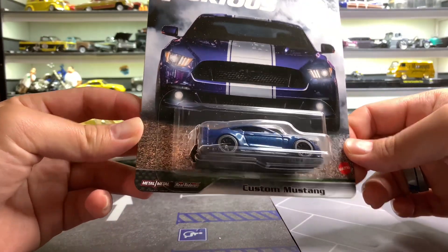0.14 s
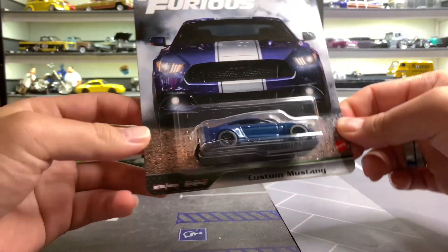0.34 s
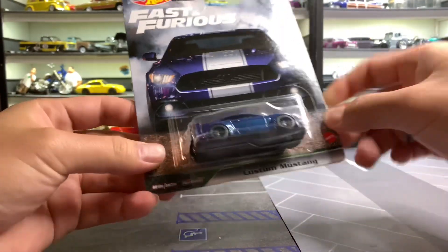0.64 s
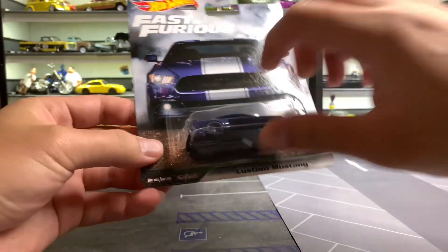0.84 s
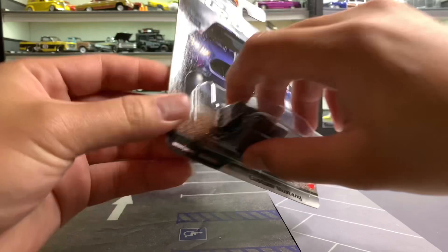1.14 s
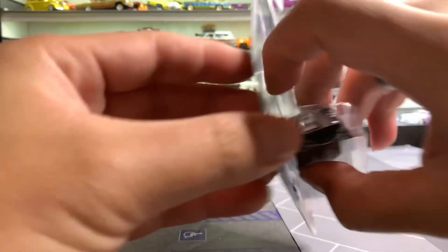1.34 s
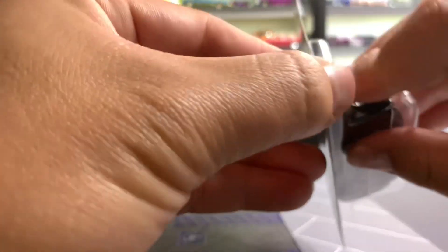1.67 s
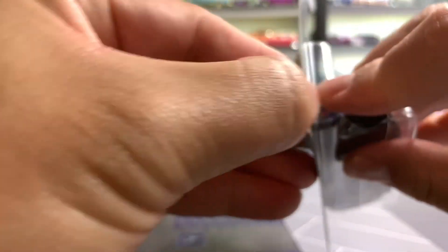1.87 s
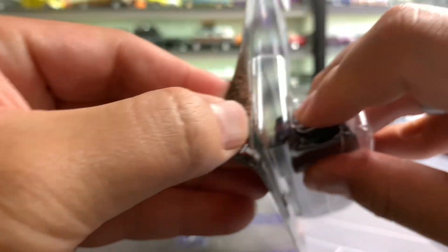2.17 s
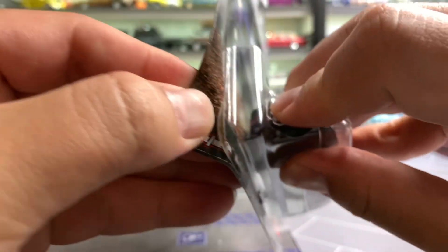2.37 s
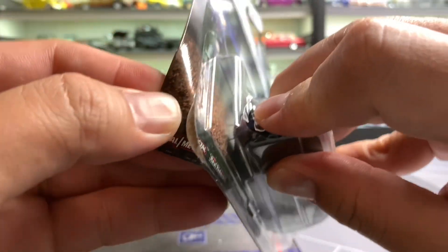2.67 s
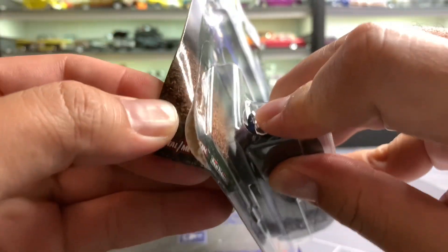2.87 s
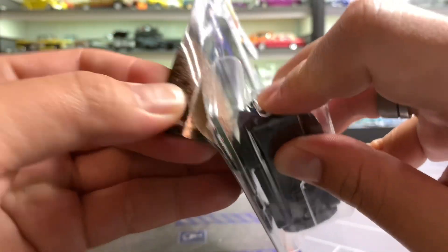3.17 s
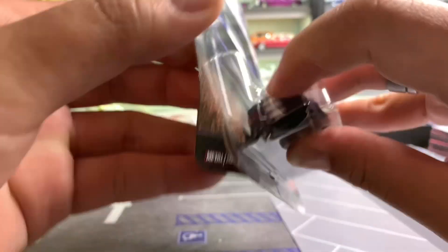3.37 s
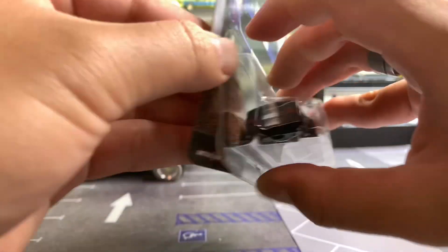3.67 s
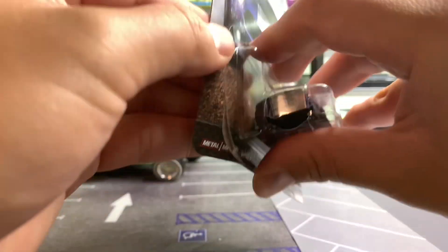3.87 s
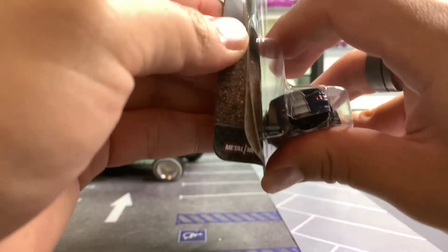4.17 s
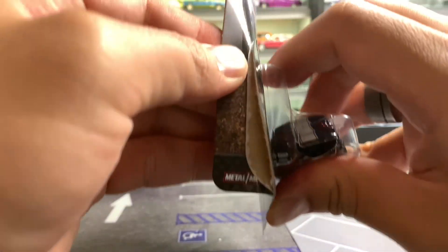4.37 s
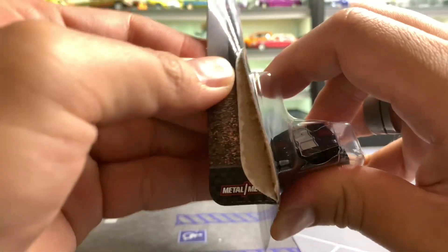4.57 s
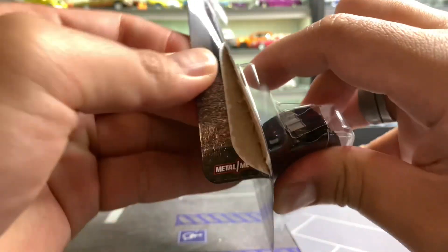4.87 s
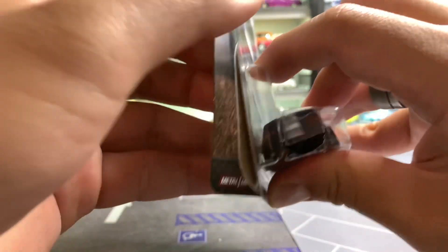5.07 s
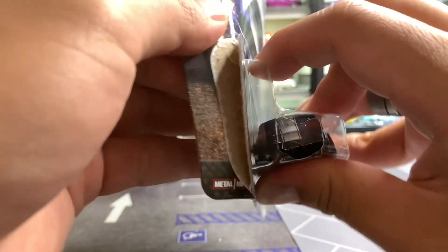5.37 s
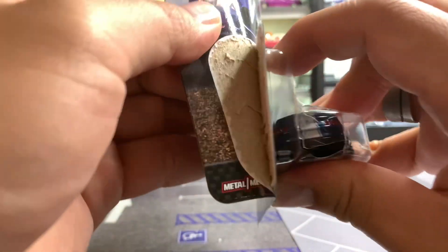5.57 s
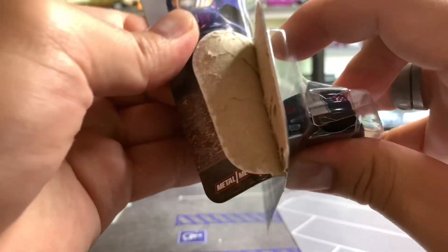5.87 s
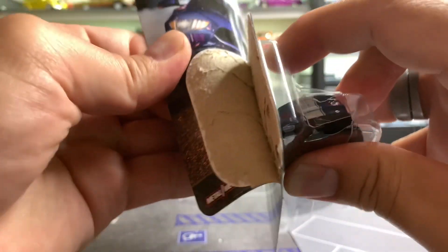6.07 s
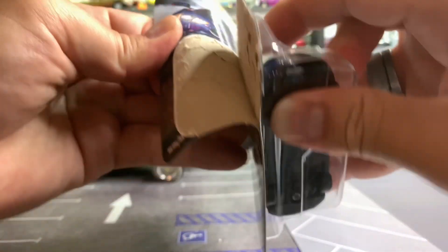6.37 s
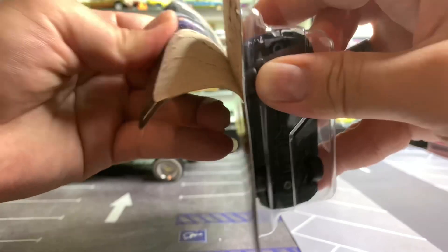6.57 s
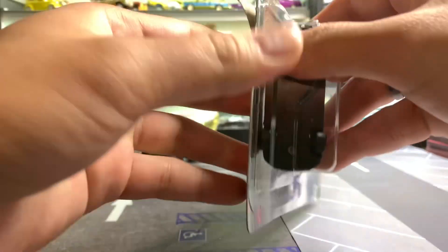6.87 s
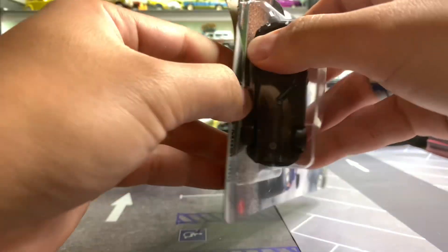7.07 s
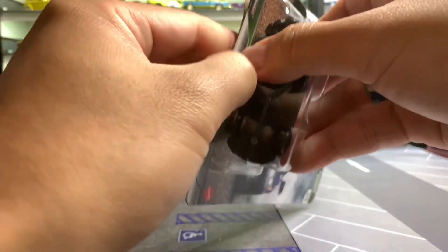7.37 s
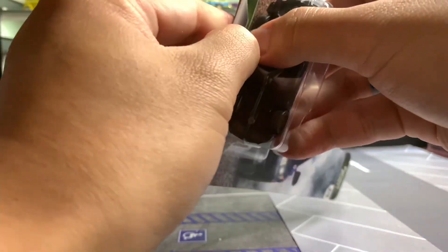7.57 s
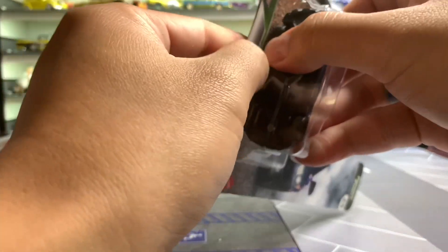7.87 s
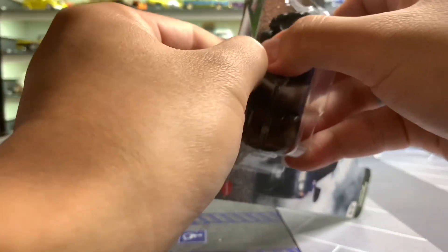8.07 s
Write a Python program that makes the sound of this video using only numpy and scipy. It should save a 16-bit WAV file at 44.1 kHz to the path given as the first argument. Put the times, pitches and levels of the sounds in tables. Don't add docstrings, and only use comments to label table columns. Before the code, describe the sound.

Two hands open a blister pack at close range. Soft knocks and rubs give way to bright single cracks, a brief squeaky creak and fine fizzing as glued paper fibres part. A ripping burst peaks after five seconds, more tearing follows, then bumps, a sharp plastic snap and small handling sounds. Short room reflections and very quiet low fan rumble surround it.

```python
import sys
import numpy as np
from scipy import signal
from scipy.fft import rfft, irfft
from scipy.io import wavfile
from scipy.ndimage import uniform_filter1d

SR = 44100
rng = np.random.default_rng(int(sys.argv[2]) if len(sys.argv) > 2 else 0)


def unload_audio(sound):
    columns = np.transpose(np.atleast_2d(sound))
    steps = np.round(np.clip(columns, -1, 1) * 32767)
    wavfile.write(sys.argv[1], SR, steps.astype(np.int16))


def invert_db(level):
    return 10 ** (np.asarray(level, dtype=float) / 20)


N = 363384

# (frequency [Hz], density [dB per Hz])
AIR_SPECTRUM = [(35, -55.5), (60, -3.5), (194, -15), (615, -21), (940, -30.5), (1270, -28.5),
                (13000, -39.5), (16500, -55.5)]
AIR_DB = -63
# (centre [Hz], width [Hz], level [dB])
FAN_RUMBLE = [(28, 9.8, -66.5), (44.6, 14.7, -61), (119.7, 7, -71)]
FAN_HZ, FAN_DB = 43.8, -56.2
# (frequency [Hz], decay time T60 [s])
ROOM_DECAY = [(300, 0.08), (800, 0.14), (2300, 0.17), (5500, 0.22), (9000, 0.04), (15000, 0.11)]
# (delay [s], level [dB])
REFLECTIONS = [
    (.0031, -21),
    (0.0118, -20),
]

# (frequency [Hz], width [Hz], level [dB])
CARD_MODES = [(180, 130, -8), (288, 35, 0), (464.7, 34, 3), (756, 195, 1), (900, 175, -2.5),
              (1185, 144, -4)]
# (frequency [Hz], width [Hz], level [dB])
SHELL_MODES = [(2330, 60, -8.5), (3304, 264, -4), (5020, 167, -23), (6790, 67, -12.5), (1750, 110, -40.5)]
# (frequency [Hz], width [Hz], level [dB])
FIBRE_MODES = [(7800, 1000, 0.5), (10000, 1300, 9.5), (12700, 1200, 4), (14550, 250, -13),
               (14400, 3300, -24.5)]

# (time [s], peak [dB], ring [Hz])
KNOCKS = [(0.272, -46.5, 1100), (0.326, -49, 600), (0.404, -33, 900), (0.642, -39.5, 1150),
          (0.667, -31, 1167), (1.061, -33.5, 900), (1.215, -43, 720), (1.368, -28, 733), (1.789, -43, 750),
          (3.229, -29.5, 800), (3.302, -34.5, 780), (3.48, -40, 665), (3.6247, -35.5, 690),
          (3.667, -37, 736), (3.811, -43.5, 700), (3.893, -39, 800), (4.313, -37.5, 1340),
          (4.6, -42.5, 756), (4.645, -40.5, 733), (4.7, -43, 740), (4.733, -37, 730), (4.991, -37, 725),
          (5.153, -40.5, 780), (5.745, -30, 746), (5.777, -32.5, 770), (6.53, -34, 1185),
          (6.701, -28, 1260), (7.507, -32.5, 876), (2.397, -43.5, 750), (1.281, -47, 1100)]
# (time [s], peak [dB], ring [Hz])
FLEXES = [(1.3, -32.5, 470), (2.136, -33.5, 460), (3.667, -38, 100), (4.793, -36, 434), (4.853, -35, 460),
          (5.294, -28.5, 425), (5.347, -27.5, 424), (6.672, -33, 476), (7.134, -22, 371),
          (7.137, -25.5, 230), (7.953, -37, 580), (7.975, -30, 125), (8.216, -38.5, 240),
          (7.99, -34.5, 106), (2.665, -42, 260), (4.645, -38, 200), (6.61, -46, 270), (4.439, -49, 450),
          (0.409, -34, 644)]

# (time [s], slip rate [Hz], level [dB])
CREAK = [(2.972, 385, -70), (2.985, 360, -51), (3.01, 342, -49), (3.045, 288, -50), (3.063, 340, -60),
         (3.082, 378, -51), (3.1, 325, -51), (3.12, 258, -53), (3.135, 250, -66)]
# (frequency [Hz], width [Hz], level [dB])
CREAK_MODES = [(700, 480, -6.5), (1454, 340, -3.5), (3100, 270, -6)]
# (start [s], end [s], start pitch [Hz], end pitch [Hz], level [dB])
PANEL_RINGS = [(0.547, 0.733, 1120, 1150, -68), (1.613, 2.117, 3120, 3100, -69.5),
               (2.2, 2.96, 12400, 12500, -67), (4.058, 4.3, 2410, 2180, -65),
               (4.33, 4.558, 3640, 3340, -61.5), (4.204, 4.563, 11700, 12000, -60),
               (5.327, 5.403, 1700, 1730, -47.5), (5.472, 5.647, 4840, 4700, -51),
               (6.06, 6.175, 1750, 1770, -60.5), (6.17, 6.44, 2400, 2230, -56),
               (6.174, 6.31, 1440, 1250, -52), (6.36, 6.535, 4550, 4900, -57.5),
               (8.011, 8.11, 656, 590, -45.5), (8.015, 8.09, 1370, 1510, -54),
               (8.052, 8.115, 248, 484, -47)]

# (time [s], peak [dB], ring [Hz])
EDGE_CRACKS = [(0.403, -42.5, 1730), (1.3697, -21.5, 3010), (2.135, -18, 2750), (2.333, -21.5, 5700),
               (3.2188, -29, 3480), (3.2295, -29.5, 2510), (3.3305, -19, 4900), (3.3683, -23, 2580),
               (3.5991, -38, 2190), (3.922, -31, 3660), (3.9683, -24.5, 3660), (3.9978, -31.5, 3840),
               (4.0132, -30, 3740), (4.1013, -24, 6560), (4.132, -28.5, 2450), (4.39, -30.5, 3520),
               (4.5773, -30.5, 3400)]
# (time [s], peak [dB], ring [Hz])
RIP_CRACKS = [(4.813, -31, 2320), (4.8775, -32, 7300), (5.2924, -38, 2230), (5.3244, -34, 1850),
              (5.3287, -29, 3850), (5.339, -23, 4000), (5.344, -16.5, 3500), (5.3464, -10.5, 3160),
              (5.8528, -23.5, 6040), (5.943, -22.5, 5500), (5.9558, -27, 5840), (5.978, -18, 3730),
              (6.0228, -16, 2090), (6.2337, -33, 2140), (6.383, -32, 4940), (6.3937, -21.5, 2140),
              (6.898, -38.5, 4560), (7.428, -36.5, 4340)]
# (time [s], peak [dB], ring [Hz])
FULL_SNAPS = [(1.4403, -31.5, 5800), (2.1392, -9, 5760), (2.3967, -30.5, 2120), (2.486, -38, 2300),
              (2.51, -30, 3580), (2.6694, -41, 2400), (2.7713, -32, 3820), (3.7404, -40, 2050),
              (4.644, -22.5, 3240), (5.6204, -24.5, 6400), (5.6593, -20, 5670), (5.681, -24.5, 5010),
              (5.8158, -25, 5850), (5.9294, -31, 5900), (6.035, -22.5, 3630), (6.670, -26, 1860),
              (6.762, -34.5, 4100), (7.1355, -24.5, 1380), (7.5079, -11.5, 2460), (7.445, -33, 1584), ]
# (time [s], peak [dB], ring [Hz])
POPS = [(0.6647, -33.5, 1530), (1.064, -38, 1580), (1.3004, -34, 1640), (1.7895, -40.5, 2330),
        (2.6325, -39, 6200), (3.171, -25.5, 3730), (3.1863, -26, 2470), (3.2293, -13.5, 2480),
        (3.3035, -32.5, 2480), (3.487, -36.5, 2180), (4.3232, -26, 2350), (4.5983, -35.5, 2200),
        (4.733, -36, 3230), (4.992, -32.5, 2200), (5.1527, -40, 2220), (5.7653, -22.5, 6160),
        (6.351, -28.5, 2300), (6.446, -32, 4830), (6.7002, -28.5, 2350), (6.9945, -42, 2230),
        (7.0133, -35.5, 1660), (7.4514, -31, 1660), (7.3224, -33, 1800), (7.76, -38, 2230),
        (7.762, -34, 1590)]
# (time [s], peak [dB])
TICKS = [(2.0033, -37.5), (2.0426, -43), (2.2927, -46), (2.447, -39), (4.554, -29.5), (5.361, -24),
         (5.3817, -23), (5.3981, -23), (5.42, -26), (5.4296, -24.5), (5.4887, -24), (5.525, -25),
         (5.5375, -24), (5.5583, -23.5), (5.59, -28), (5.733, -28), (5.95, -27), (7.314, -41.5),
         (7.995, -43.5), (1.98, -47), (2.2588, -42), (5.3483, -13), (2.954, -43), (4.18, -37),
         (4.2402, -30.5), (4.2837, -32), (4.2997, -30.5), (4.4179, -35), (4.427, -39), (4.477, -42)]
TICK_HZ = 4900
CRACK_TREBLE_DB, SNAP_TREBLE_DB, POP_TREBLE_DB, TICK_TREBLE_DB = -1, -7.5, -25, 5

# (start [s], hold [s], fizz [dB], sag over the hold [dB], shell over fizz [dB])
TEARS = [(1.869, 0.11, -68.5, -7.5, -5), (2.24, 0.65, -66.5, -3, 0), (2.987, 0.11, -54.5, -5, -1.5),
         (4.055, 0.096, -55, -6, -11), (4.187, 0.083, -54.5, -13.5, -9.5), (4.294, .23, -48, 5.5, -7),
         (4.554, .23, -55, 6, -4.5), (5.349, 0.17, -35.5, 9.5, -7.5), (5.523, 0.258, -40.5, -0.5, -5.5),
         (5.797, 0.12, -39, 13.5, 1), (5.957, 0.039, -46.5, 0.5, 0.5), (6.037, 0.12, -43.5, 7, 0),
         (6.172, 0.14, -43, 2, 0.5), (6.355, .17, -46.5, 2.5, 0), (7.422, 0.028, -66, 17, 7)]
# (start [s], hold [s], scrape [dB])
SQUEEZES = [(0.661, 0.01, -57.5), (1.072, 0.036, -61.5), (1.212, 0.069, -59.5), (1.442, 0.11, -61.5),
            (2.122, 0.022, -52.5), (2.63, .04, -68), (3.178, .02, -62), (3.306, 0.037, -54.5),
            (3.364, 0.024, -48.5), (3.479, 0.01, -58.5), (3.63, 0.047, -64.5), (3.744, 0.0076, -58),
            (3.799, 0.024, -60), (3.881, 0.075, -60.5), (4.32, 0.014, -56), (4.984, 0.017, -59),
            (5.04, 0.023, -53), (5.073, 0.017, -46.5), (6.23, 0.044, -57), (6.57, .08, -70),
            (6.677, 0.022, -46), (6.725, 0.057, -55), (6.911, 0.0071, -60.5), (7.027, 0.0067, -54.5),
            (7.137, 0.039, -58), (7.223, 0.052, -63), (7.313, 0.032, -59.5), (7.76, 0.013, -62.5),
            (7.955, 0.015, -62.5), (8.034, 0.034, -54.5)]
# (start [s], hold [s], rub [dB])
SLIDES = [(.275, 0.16, -62), (0.583, 0.093, -57.5), (1.21, 0.082, -63), (1.43, .14, -61.5),
          (2.492, 0.5, -67.5), (3.132, 0.08, -59.5), (3.398, 0.099, -55), (3.627, 0.31, -59),
          (4.6, 0.23, -64.5), (5.573, 0.14, -54.5), (5.802, 0.052, -52.5), (6.355, 0.2, -60),
          (6.625, 0.089, -51.5), (6.7, 0.028, -61), (7.17, 0.24, -64.5), (7.558, 0.35, -67.5),
          (7.955, 0.025, -61), (8.045, 0.053, -52.5)]
# (rise [dB per s], fall [dB per s])
TEAR_SLOPES, SQUEEZE_SLOPES, SLIDE_SLOPES = (480, 420), (810, 486), (380, 310)
TEAR_RUB_DB = -20
SQUEEZE_FIZZ_DB, SQUEEZE_SHELL_DB, SQUEEZE_RUB_DB = -8, -1.5, -4
# (level under the peak [dB], rise [dB per s], fall [dB per s])
AFTER_CRACK, AFTER_THUMP = (-34.5, 2700, 222), (-17.5, 1800, 400)
AFTER_FIZZ_DB = -2
REST_DB = (-84, -79.5, -72.5, -78)


def evened(x):
    return x / np.sqrt(np.mean(x ** 2) + 1e-20)


def peaked(x):
    return x / np.abs(x).max()


def read(points, hz):
    f, value = np.transpose(points)
    return np.interp(np.log(hz + 1), np.log(f + 1), value)


def add(mix, s, sound):
    part = mix[round(s * SR):][:len(sound)]
    part += sound[:len(part)]


def resonate(x, hz, width):
    pole = np.exp((2j * np.pi * hz - np.pi * width) / SR)
    return 2 * signal.lfilter([1 - abs(pole)], [1, -pole], x).real


def body(x, modes, scale=0.96):
    total = 0
    for k, (hz, width, db) in enumerate(modes):
        total = total + (-1) ** k * invert_db(db) * resonate(x, hz * scale, width)
    return total


def band(x, lo_hz, hi_hz):
    return signal.sosfilt(signal.butter(2, [lo_hz, hi_hz], "band", fs=SR, output="sos"), x)


def wander(size, shape):
    once = uniform_filter1d(rng.standard_normal(shape), size)
    return evened(uniform_filter1d(once, size))


def room_tone():
    hz = np.fft.rfftfreq(N, 1 / SR)
    hiss = irfft(rfft(rng.standard_normal(N)) * invert_db(read(AIR_SPECTRUM, hz)), N)
    tone = invert_db(AIR_DB) * evened(hiss)
    for f, width, db in FAN_RUMBLE:
        rumble = resonate(resonate(rng.standard_normal(N), f, width), f, width)
        tone = tone + invert_db(db) * evened(rumble)
    motor = np.sin(2 * np.pi * FAN_HZ * np.arange(N) / SR)
    return tone + invert_db(FAN_DB) * evened(motor)


def room(x):
    taps = np.zeros(SR // 2)
    at = np.arange(300, SR // 2 - 20, 20)
    taps[at + rng.integers(0, 20, at.shape)] = rng.choice([-1., 1.], at.shape)
    hz, t, z = signal.stft(taps, SR, nperseg=128)
    t60 = read(ROOM_DECAY, hz)[:, None]
    tail = signal.istft(z * invert_db(-60 * t / t60), SR, nperseg=128)[1]
    wet = invert_db(-17) * signal.fftconvolve(x, tail / np.linalg.norm(tail))[:N]
    for s, db in REFLECTIONS:
        add(wet, s, invert_db(db) * x)
    return wet


def thump(db, hz, chance):
    t = np.arange(len(chance)) / SR
    t60 = 0.02 + 3 / hz
    push = chance * (1 - np.exp(-t / 0.00094)) * np.exp(-t / 0.0035)
    main = resonate(push, hz, 1.96 / t60)
    others = body(push, CARD_MODES, scale=1.098) + 0.46 * push
    both = peaked(main) + 1.9 * peaked(others)
    return invert_db(db) * peaked(band(both, 0.32 * hz, 2200))


def creak(chance):
    s, hz, db = np.transpose(CREAK)
    t = s[0] + np.arange(len(chance)) / SR
    jitter = 1 + 0.32 * uniform_filter1d(chance, size=60)
    turns = np.cumsum(np.interp(t, s, hz) * jitter) / SR
    slips = np.diff(np.floor(turns), prepend=0) * invert_db(1.9 * chance)
    return evened(body(slips, CREAK_MODES)) * invert_db(np.interp(t, s, db)) * (t < s[-1])


def panel_ring(start, end, start_hz, end_hz, db, drive):
    x = drive[round(start * SR):round(end * SR)]
    hz = np.linspace(start_hz, end_hz, len(x))
    turn = np.exp(2j * np.pi * np.cumsum(hz) / SR)
    r = np.exp(-np.pi * (0.16 * start_hz + 80) / SR)
    smooth = signal.lfilter([1], np.convolve([1, -r], [1, -r]), x / turn)
    sung = (turn * smooth).real
    return invert_db(db) * evened(sung) * signal.windows.tukey(len(x), 0.4)


def snap(db, treble_db, hz, chance):
    t = np.arange(chance.shape[1]) / SR
    slip = 0.0011 + 0.0057 * invert_db(0.37 * db)
    burst = (1 - np.exp(-t / (0.058 * slip))) * np.exp(-(t / slip) ** 2)
    in_shell, in_air = chance * abs(chance[0]) * burst
    facet = resonate(in_shell, hz, 0.082 * hz + 100)
    middle = peaked(facet + 0.26 * body(in_shell, SHELL_MODES) + 0.19 * band(in_shell, 1360, 7500))
    top = peaked(band(body(in_air, FIBRE_MODES) + 0.94 * in_air, 4100, 14050))
    share = min(invert_db(treble_db), 1.)
    return invert_db(db) * peaked(np.sqrt(1.03 - share ** 2) * middle + share * top)


def effort(t, start, hold, db, sag_db, rise, fall):
    late = t[:, None] - start
    onset = rise * np.maximum(-late, 0)
    release = fall * np.maximum(late - hold, 0)
    level = db - onset - release - sag_db * np.clip(late / hold, 0, 1)
    return (invert_db(level) ** 2).sum(1)


def motions():
    t = np.arange(0, N + 64, 64) / SR
    start, hold, db, sag_db, shell_db = np.transpose(TEARS)
    tear = effort(t, start, hold, db, sag_db, *TEAR_SLOPES)
    tear_shell = effort(t, start, hold, db + shell_db, sag_db, *TEAR_SLOPES)
    squeeze = effort(t, *np.transpose(SQUEEZES), 0, *SQUEEZE_SLOPES)
    slide = effort(t, *np.transpose(SLIDES), 0, *SLIDE_SLOPES)
    s, db, _ = np.transpose(EDGE_CRACKS + RIP_CRACKS + FULL_SNAPS)
    rustle = effort(t, s + 0.002, 0.0021, db + AFTER_CRACK[0], 0, *AFTER_CRACK[1:])
    s, db, _ = np.transpose(KNOCKS + FLEXES)
    shove = effort(t, s + 0.004, 0.0054, db + AFTER_THUMP[0], 0, *AFTER_THUMP[1:])
    fizz = tear + invert_db(2 * SQUEEZE_FIZZ_DB) * squeeze + invert_db(2 * AFTER_FIZZ_DB) * rustle
    shell = tear_shell + invert_db(2 * SQUEEZE_SHELL_DB) * squeeze + rustle
    rub = slide + shove + invert_db(2 * TEAR_RUB_DB) * tear + invert_db(2 * SQUEEZE_RUB_DB) * squeeze
    now = np.arange(N) / SR
    return [np.interp(now, t, np.sqrt(power + invert_db(2 * rest_db)))
            for power, rest_db in zip((fizz, shell, rub, squeeze), REST_DB)]


def fibres(per_s, spread_db, clump_db):
    clumps = np.clip(wander(size=70, shape=N), 0, 2.6) ** 2 + 0.5 * wander(size=900, shape=N)
    size = invert_db(spread_db * np.minimum(rng.exponential(1, N), 4) + clump_db * clumps)
    return evened(size * (rng.random(N) < per_s / SR))


def bent(x, patchy_db):
    z = signal.stft(x, nperseg=256)[2]
    patches = evened(uniform_filter1d(wander(size=36, shape=z.shape), size=2, axis=0))
    return evened(signal.istft(z * invert_db(patchy_db * patches), nperseg=256)[1][:N])


def peel():
    fizz, shell, rub, squeeze = motions()
    breaks = fibres(per_s=9000, spread_db=2.5, clump_db=1.9)
    in_air, in_shell = breaks * rng.choice([-1., 1.], (2, N))
    slides = fibres(per_s=2500, spread_db=0.5, clump_db=2.5) * rng.choice([-1., 1.], N)
    slides = slides + 0.088 * in_shell
    top = bent(band(body(in_air, FIBRE_MODES) + 0.6 * in_air, 6000, 17500), patchy_db=2.6)
    middle = bent(band(body(in_shell, SHELL_MODES) + 0.35 * in_shell, 1500, 7500), patchy_db=2.8)
    low = bent(band(body(slides, CARD_MODES) + 0.2 * slides, 130, 1500), patchy_db=2.2)
    pack = fizz * top + shell * middle + rub * low
    pack += squeeze * evened(band(middle + low, 850, 3970))
    for row in PANEL_RINGS:
        add(pack, row[0], panel_ring(*row, in_shell))
    return pack


def scene():
    tone, pack = room_tone(), peel()
    ticks = [row + (TICK_HZ,) for row in TICKS]
    for rows, treble_db in ((EDGE_CRACKS, CRACK_TREBLE_DB), (RIP_CRACKS, CRACK_TREBLE_DB),
                            (FULL_SNAPS, SNAP_TREBLE_DB), (POPS, POP_TREBLE_DB), (ticks, TICK_TREBLE_DB)):
        for (s, db, hz), chance in zip(rows, rng.standard_normal((30, 2, 1200))):
            add(pack, s, snap(db, treble_db, hz, chance))
    for rows in (KNOCKS, FLEXES):
        for (s, db, hz), chance in zip(rows, rng.standard_normal((30, 5000))):
            add(pack, s, thump(db, hz, chance))
    add(pack, CREAK[0][0], creak(rng.standard_normal(8000)))
    return (pack + room(pack) + tone)[None]


def roll_off(x):
    return signal.sosfilt(signal.butter(12, 16960, fs=SR, output="sos"), x)


def record(dry):
    edge = signal.firwin(255, 15950, window=("kaiser", 6), fs=SR)
    mix = signal.oaconvolve(dry, edge[None], "same")
    return roll_off(mix)


dry = scene()
out = record(dry)
unload_audio(out)
```